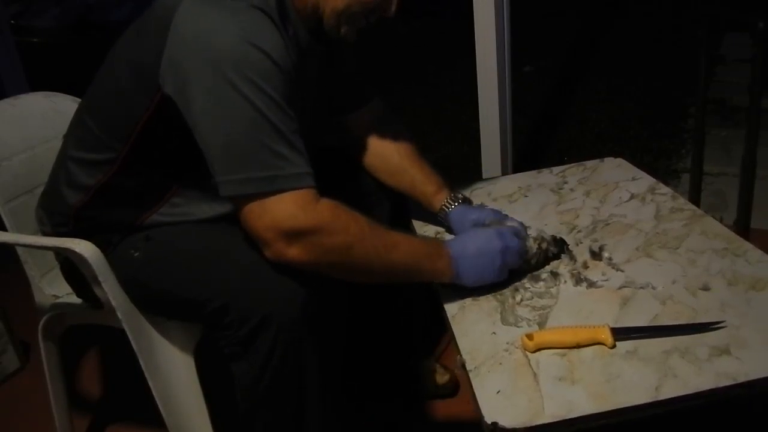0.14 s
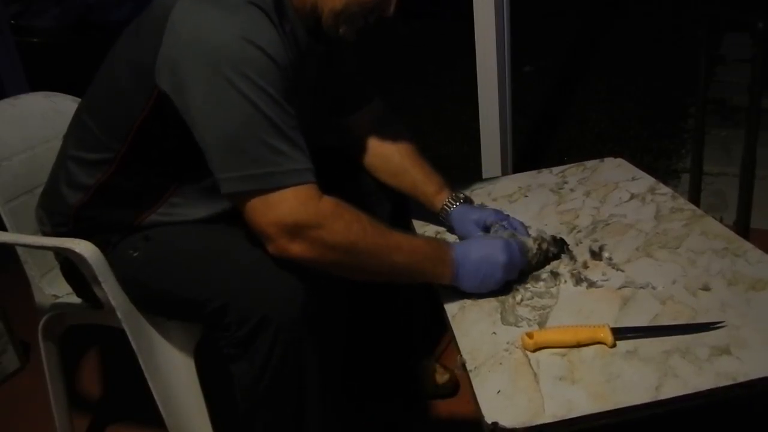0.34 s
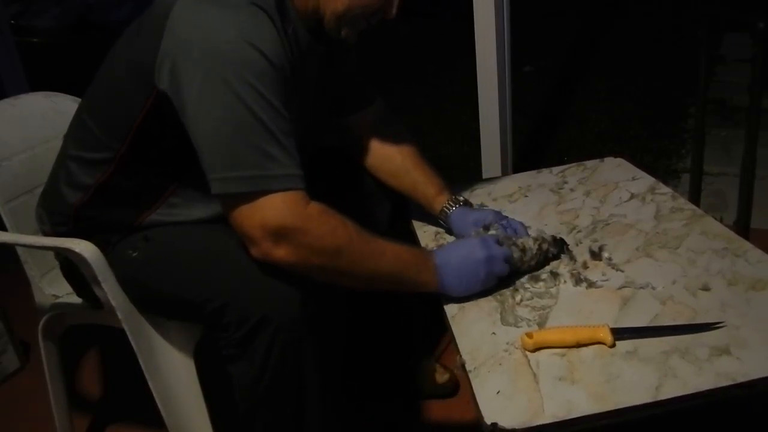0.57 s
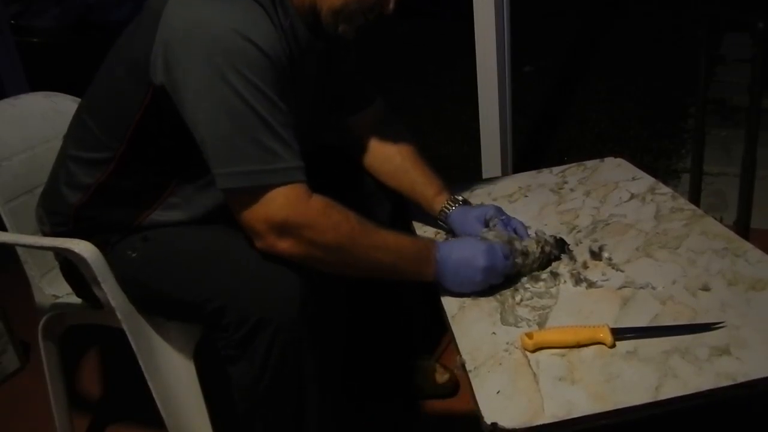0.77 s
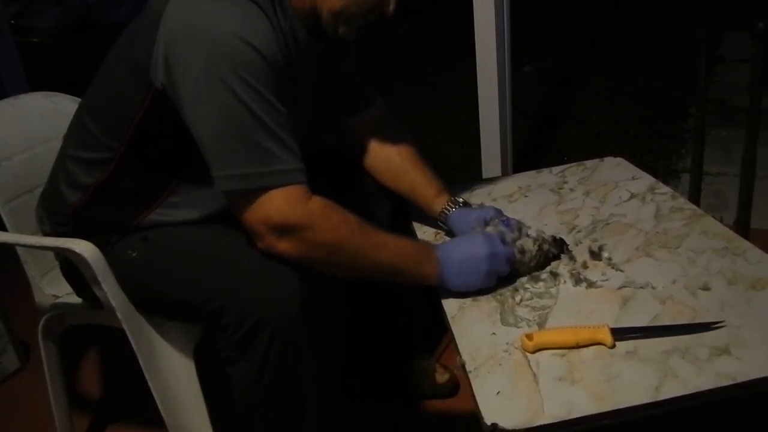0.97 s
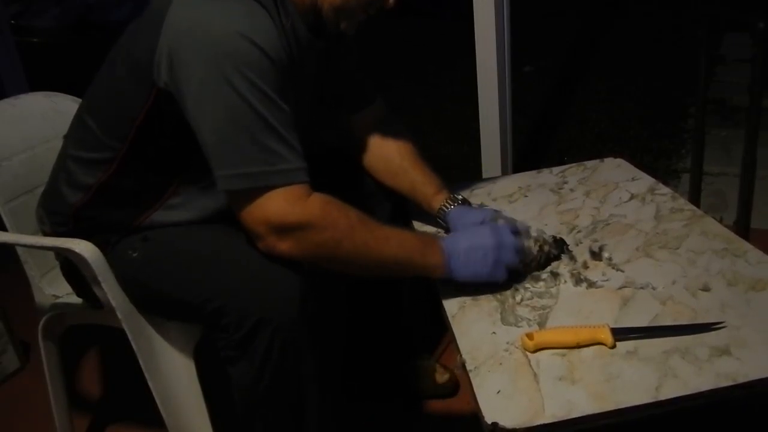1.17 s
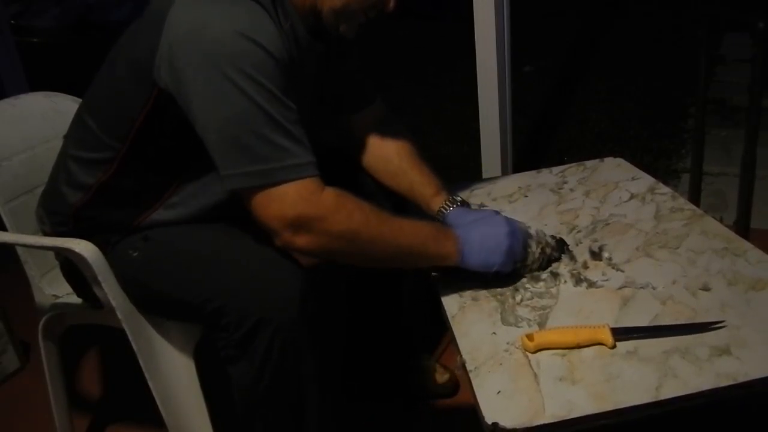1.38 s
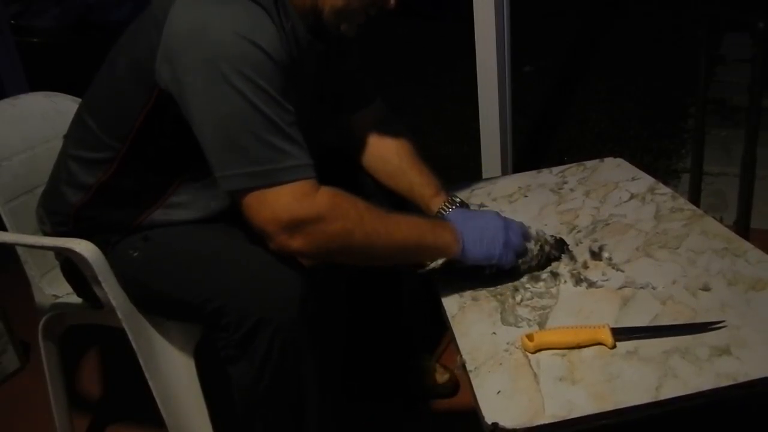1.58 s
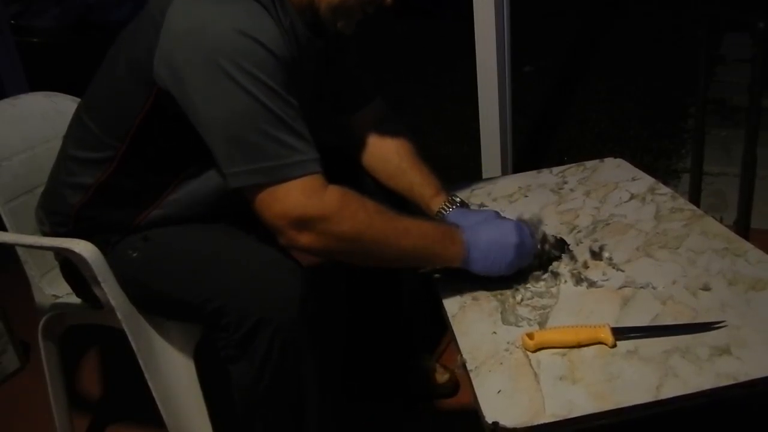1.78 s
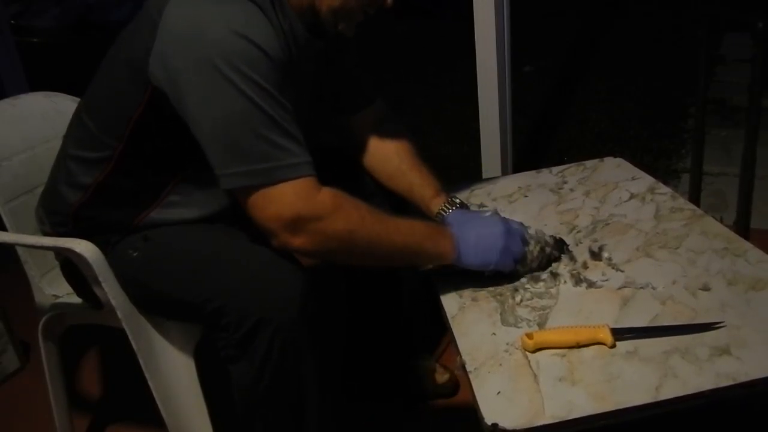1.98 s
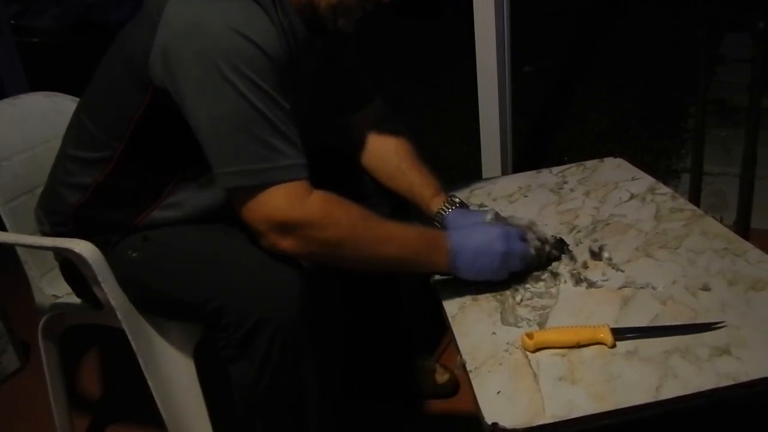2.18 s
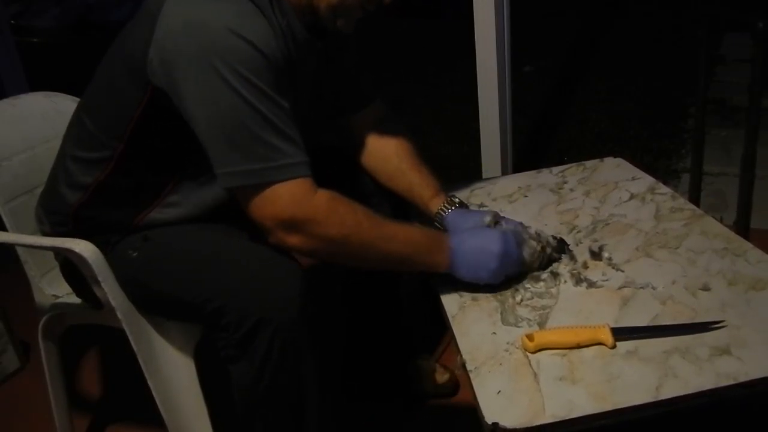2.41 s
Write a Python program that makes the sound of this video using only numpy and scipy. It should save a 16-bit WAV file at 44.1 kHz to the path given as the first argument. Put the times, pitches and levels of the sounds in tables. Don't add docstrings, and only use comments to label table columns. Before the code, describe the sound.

Two brief dry tears of feathers pulled from duck skin, about a second apart, each ending in crackling pops, with faint glove rustle, ticks and squeaks between, heard close in a room with quiet rumble and hiss.

```python
import sys
import numpy as np
from scipy import signal
from scipy.fft import rfft, irfft, next_fast_len
from scipy.io import wavfile
from scipy.ndimage import uniform_filter1d, map_coordinates

SR = 44100
rng = np.random.default_rng(int(sys.argv[2]) if len(sys.argv) > 2 else 0)


def materialize(psi):
    bounded = np.clip(np.atleast_2d(psi).T, -1, 1)
    quanta = np.round(bounded * 32767).astype(np.int16)
    wavfile.write(sys.argv[1], SR, quanta)


def invert_db(level):
    return 10 ** (np.asarray(level, dtype=float) / 20)


N = 107780
TIME_S = np.arange(N) / SR


def unit(x):
    return x / np.sqrt(np.mean(x ** 2) + 1e-20)


def along(points, hz):
    point_hz, value = np.transpose(points)
    return np.interp(np.log(hz + 1), np.log(point_hz + 1), value)


def wobble(rate_hz):
    knots = rng.standard_normal(int(N * rate_hz / SR) + 4)
    return map_coordinates(knots, [np.arange(N) * rate_hz / SR])


def filtered(x, response):
    size = next_fast_len(N + SR // 2)
    spectrum = rfft(x, size) * response(np.fft.rfftfreq(size, 1 / SR))
    return irfft(spectrum, size)[..., :N]


def peak(f, hz, width_hz):
    return 1j * f * width_hz / (hz * hz - f * f + 1j * f * width_hz)


def grains(start_s, level_db, pitch_hz, t60_s):
    t = np.arange(SR // 20)[None] / SR
    columns = (start_s, level_db, pitch_hz, t60_s)
    start_s, level_db, pitch_hz, t60_s = (np.reshape(v, (-1, 1)) for v in columns)
    decay = invert_db(level_db - 60 * t / t60_s)
    wave = decay * np.sin(2 * np.pi * pitch_hz * t) * (1 - np.exp(-t * pitch_hz))
    at = np.round(start_s * SR).astype(int) + np.arange(t.size)
    return np.bincount(at.ravel(), wave.ravel(), N + SR)[:N]


# hz, likeness (0-1)
LIKENESS = [(60, 0.91), (180, 0.81), (550, 0.85), (1650, 0.71), (4970, 0.36), (15000, 0.21)]
# hz, left_over_right_db
LEFT_LEAN = [(60, 5.5), (180, 2.5), (550, 1), (1650, 0.5), (4970, -0.5), (15000, 0.5)]


def rush(gain, patchy_db):
    z = signal.stft(rng.standard_normal((2, N)), nperseg=512)[2]
    field = uniform_filter1d(rng.standard_normal(z.shape[1:]), 6, 0)
    field = uniform_filter1d(field, 14, 1)
    pair = signal.istft(z * invert_db(patchy_db * unit(field)), nperseg=512)[1][:, :N]

    def mid_side(hz):
        turn = np.arccos(np.clip(along(LIKENESS, hz), -1, 1)) / 2
        return gain(hz) * [np.cos(turn), np.sin(turn)]

    def lean(hz):
        return invert_db(np.outer([0.5, -0.5], along(LEFT_LEAN, hz)))

    mid, side = filtered(pair, mid_side)
    return unit(filtered(np.array([mid + side, mid - side]), lean))


# start_s, rise_s, hold_s, tear_db, quills_db
TEARS = [
    (0.671, 0.017, .024, -23.5, -16),
    (1.754, .022, .019, -22.5, -15.5),
]
# pitch_hz, width_hz, level_db
TAUT_SKIN = [
    [(4160, 750, 2), (5280, 470, -2.5), (9420, 750, -2), (10480, 710, -10), (8400, 530, -12.5),
     (13400, 2500, -17), (4530, 3400, -11.5)],
    [(4330, 630, 0.5), (5680, 380, -3.5), (9170, 1800, -13.5), (10800, 1600, -21), (7540, 480, -25),
     (13400, 4000, -20.5), (4540, 2300, -14)],
]


def tear(row, skin_modes):
    start_s, rise_s, hold_s, tear_db, quills_db = row
    lead_db, split_hz = -26.5, 7000
    low_t60_s, high_t60_s = 0.03, 0.062
    t = TIME_S - start_s
    rise_db = lead_db * np.clip(1 - t / rise_s, 0, None) ** 2
    after_s = np.clip(t - rise_s - hold_s, 0, None)

    def skin(f):
        return sum(invert_db(db) * np.abs(peak(f, hz, width)) ** 3 for hz, width, db in skin_modes)

    barbs = rng.standard_normal(N) * invert_db(0.5 * wobble(344))
    hiss = unit(filtered(barbs, skin))
    low = filtered(hiss, lambda f: f < split_hz)
    high = hiss - low
    hiss = invert_db(-60 * after_s / low_t60_s) * low + invert_db(-60 * after_s / high_t60_s) * high
    return invert_db(tear_db + rise_db) * hiss + quills(start_s + rise_s + hold_s, quills_db)


def quills(release_s, level_db):
    from_hz, to_hz, spread = 3230, 1790, 0.7
    length_s, early_s, cycles = 0.039, 0.004, 6.14
    fade_db, tilt_db, size_db = -14.5, -2, 20
    step, above, size = rng.random((3, 120))
    progress = np.cumsum(step) / np.sum(step)
    glide_hz = from_hz * (to_hz / from_hz) ** progress ** 1.1
    pitch_hz = glide_hz * np.exp(spread * above ** 2)
    pop_db = level_db + fade_db * progress + tilt_db * above + size_db * (size ** 2 - 0.5)
    return grains(release_s - early_s + progress * length_s, pop_db, pitch_hz, cycles * 2 / pitch_hz)


# start_s, peak_db, pitch_hz
TICKS = [
    (1.0196, -37, 2070),
    (1.1159, -33, 2140),
    (1.269, -34, 2280),
    (1.323, -35, 2400),
    (1.6418, -35, 1900),
    (1.7374, -36, 2210),
    (2.4159, -37, 2100),
]
# start_s, peak_db, pitch_hz
TAP = [
    (0.495, -32, 530),
]
# start_s, length_s, pitch_hz, level_db
SQUEAKS = [
    (1.3, 0.099, 2110, -53.5),
    (0.234, 0.067, 6200, -57),
]


def taps():
    tick_t60_s, tap_t60_s, lift_db, puff_db = 0.011, 0.051, 1, 2
    start_s, peak_db, pitch_hz = np.vstack([TICKS, TAP]).T
    t60_s = [tick_t60_s] * len(TICKS) + [tap_t60_s]
    out = grains(start_s, peak_db + lift_db, pitch_hz, t60_s)
    tap_s, tap_db, _ = TAP[0]
    puff = unit(filtered(rng.standard_normal(N), lambda f: peak(f, 630, 450) ** 2))
    fade_db = -60 * np.abs(TIME_S - tap_s) / tap_t60_s
    out = out + puff * invert_db(tap_db + puff_db + fade_db) * (TIME_S > tap_s)
    for squeak_s, length_s, hz, level_db in SQUEAKS:
        swell = np.sin(np.pi * np.clip((TIME_S - squeak_s) / length_s, 0, 1))
        squeak = unit(filtered(rng.standard_normal(N), lambda f: peak(f, hz, 220) ** 2))
        out = out + invert_db(level_db) * swell * squeak
    return out


# time_s, pressure_db, brightness_db
STROKES = [(0, -57, -2.5), (.1, -63.5, -2.5), (.3, -59, -2), (.6, -62.5, -2.5), (.92, -55, -1),
           (1.13, -56, 0.5), (1.32, -54.5, -2.5), (1.35, -62, 0), (1.47, -62.5, -1.5), (1.55, -53.5, -7),
           (1.72, -57, -5), (2.0, -56, -7.5), (2.11, -68, -1.5), (2.3, -67, 6), (2.44, -55, -3.5)]
# hz, level_db (per Hz)
RUSTLE_LOW = [(1500, -49), (2200, -0.5), (3500, 1), (5500, -4.5), (7000, -3.5), (8000, -7.5), (10000, -70)]
# hz, level_db (per Hz)
RUSTLE_HIGH = [(7000, -37), (8500, -3.5), (10200, 1), (11200, -4.5), (11800, -17), (12800, -7), (14000, 1),
               (14400, -70)]


def rubbing():
    time_s, pressure, brightness = np.transpose(STROKES)
    pressure_db = np.interp(TIME_S, time_s, pressure)
    brightness_db = np.interp(TIME_S, time_s, brightness)
    low = rush(lambda hz: invert_db(along(RUSTLE_LOW, hz)), patchy_db=2.5)
    high = rush(lambda hz: invert_db(along(RUSTLE_HIGH, hz)), patchy_db=2.0)
    return invert_db(pressure_db + 0.96 * wobble(39.84)) * (low + invert_db(brightness_db) * high)


# hz, t60_s
ROOM_DECAY = [(1500, 0.23), (4000, 0.39), (7000, 0.38), (12000, .18)]


def room(x):
    tail_db, echo_db = -7.5, -19.5
    echo_s, blur_t60_s, echo_hz = 0.112, 0.093, 7100
    hz, t, z = signal.stft(rng.standard_normal((2, SR // 2)), SR, nperseg=256)
    decay = invert_db(-60 * t / along(ROOM_DECAY, hz)[:, None])
    tail = signal.istft(z * decay, SR, nperseg=256)[1]
    blur_s = np.arange(SR // 10) / SR
    blur = rng.standard_normal((2, SR // 10)) * invert_db(-60 * blur_s / blur_t60_s)

    def far_wall(f):
        return np.exp(-2j * np.pi * f * echo_s) / (1 + 1j * f / echo_hz) ** 2

    def spread(v, answer):
        wide = (answer + 0.28 * answer[::-1]) / np.linalg.norm(answer[0])
        return signal.fftconvolve(v[None], wide, axes=1)[:, :N]

    late = np.pad(x, (130, 0))
    return invert_db(tail_db) * spread(late, tail) + invert_db(echo_db) * spread(filtered(x, far_wall), blur)


# hz, level_db (per Hz)
RUMBLE = [(12, -40), (20, -17.5), (57, -0.5), (107, 0), (208, -4), (275, -6.5), (403, -11), (613, -7.5),
          (1300, -17), (1690, -89), (2860, -120)]
# hz, level_db (per Hz)
AIR_HISS = [(700, -34), (1200, -4), (1860, -6), (2700, -16.5), (5590, -19), (10200, -26), (13400, -32),
            (14500, -57), (14600, -90)]
# pitch_hz, width_hz, level_db
HUM = [(116.9, 9.9, -52.5)]


def background():
    rumble = invert_db(-41) * rush(lambda hz: invert_db(along(RUMBLE, hz)), patchy_db=0.43)
    hiss = invert_db(-52) * rush(lambda hz: invert_db(along(AIR_HISS, hz)), patchy_db=0.0)
    hum = 0
    for hz, width_hz, level_db in HUM:
        hum = hum + invert_db(level_db) * rush(lambda f: peak(f, hz, width_hz) ** 2, patchy_db=2.2)
    whine = invert_db(-53.5 + 0.4 * wobble(6)) * np.sin(2 * np.pi * 14835.3 * TIME_S)
    return rumble + hiss + hum + whine * invert_db([[0.6], [-0.6]])


def scene():
    left_db, lag_s = -0.5, 2e-5
    near = [tear(row, modes) for row, modes in zip(TEARS, TAUT_SKIN)]
    near.append(taps())

    def place(f):
        return invert_db([[left_db / 2], [-left_db / 2]]) * np.exp(np.outer([-1j, 1j], np.pi * f * lag_s))

    return filtered(sum(near), place) + sum(room(x) for x in near) + rubbing() + background()


def band_limit(x):
    return signal.sosfilt(signal.butter(12, 15660, fs=SR, output="sos"), x)


def record(dry):
    top_hz = 15250
    mix = filtered(dry, lambda f: 1 / (1 + (f / top_hz) ** 60))
    return band_limit(mix)


dry = scene()
out = record(dry)
materialize(out)
```